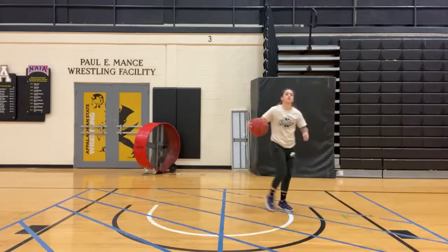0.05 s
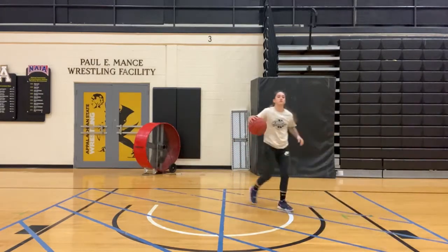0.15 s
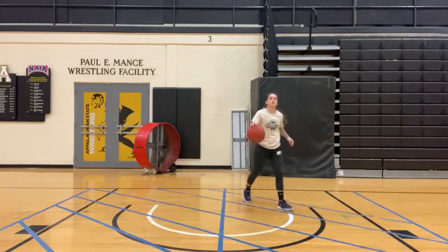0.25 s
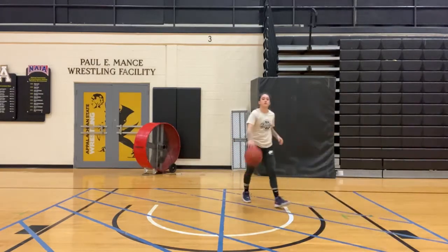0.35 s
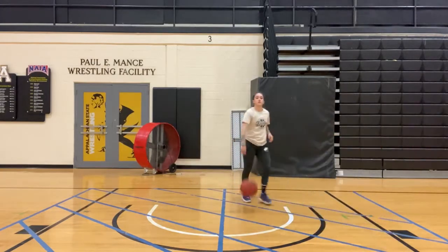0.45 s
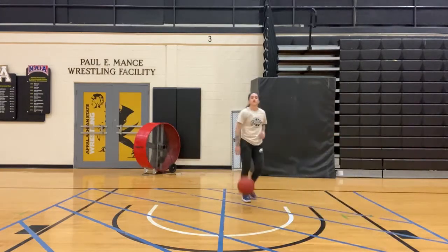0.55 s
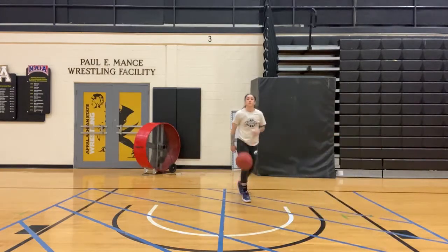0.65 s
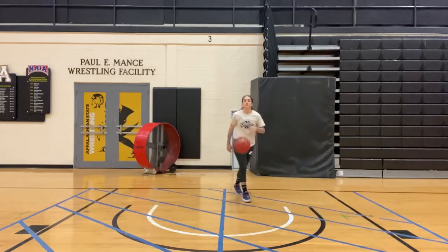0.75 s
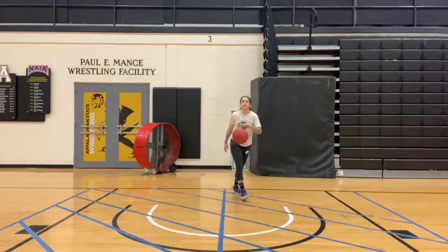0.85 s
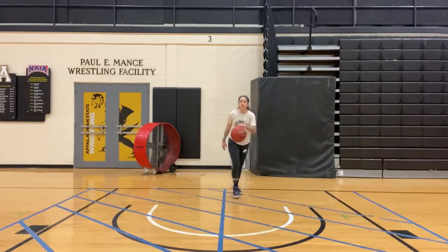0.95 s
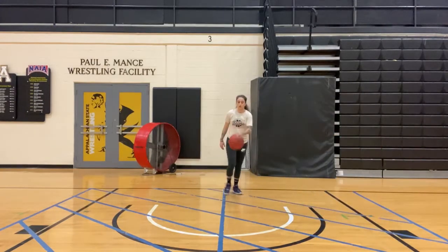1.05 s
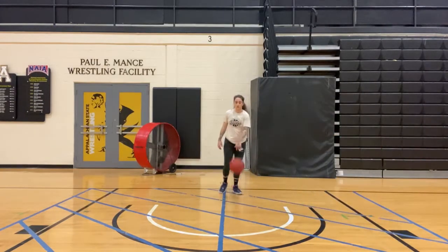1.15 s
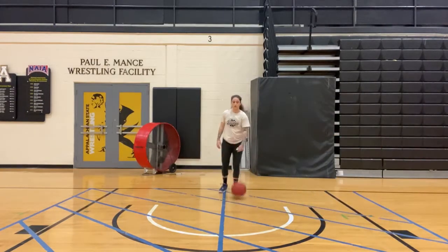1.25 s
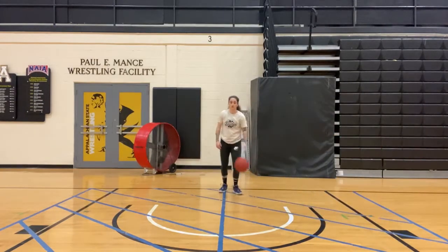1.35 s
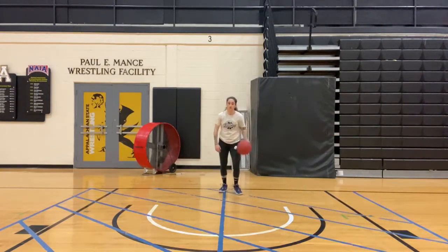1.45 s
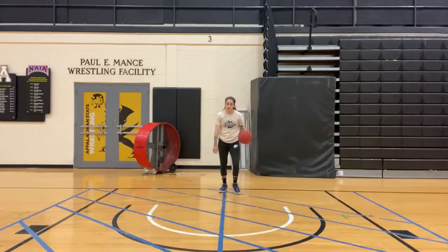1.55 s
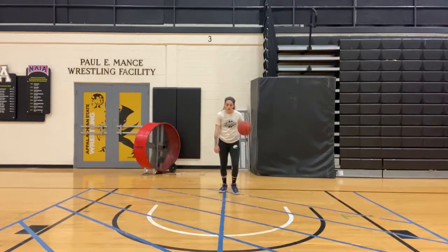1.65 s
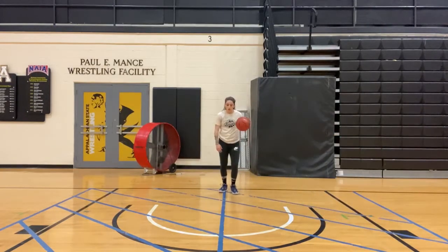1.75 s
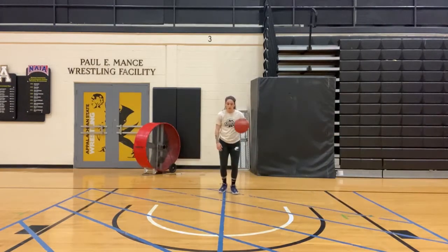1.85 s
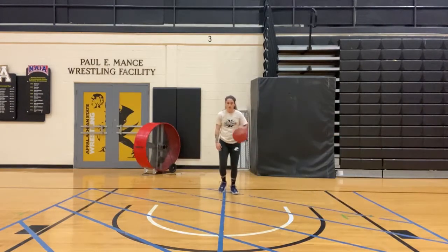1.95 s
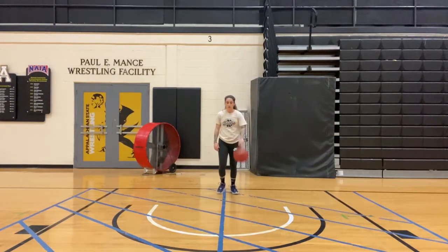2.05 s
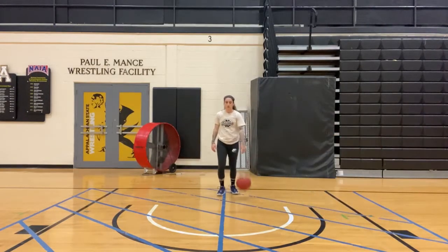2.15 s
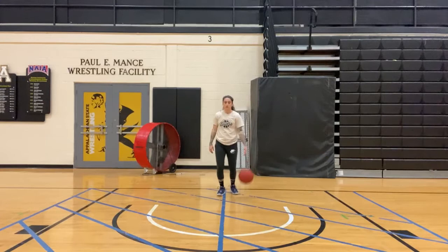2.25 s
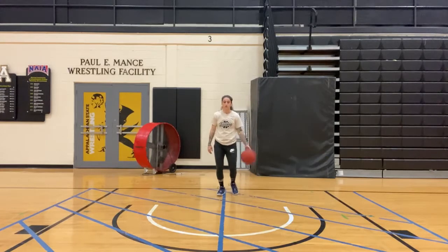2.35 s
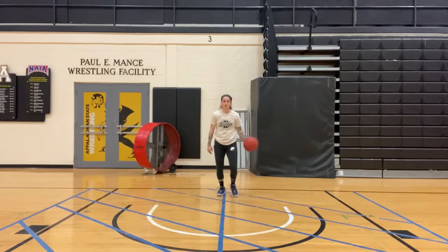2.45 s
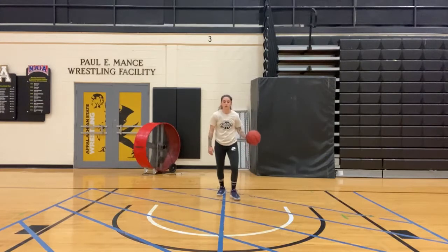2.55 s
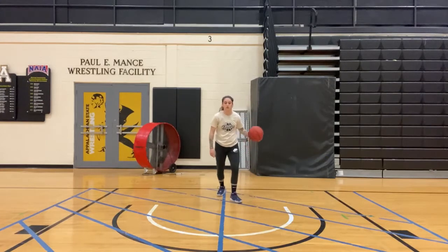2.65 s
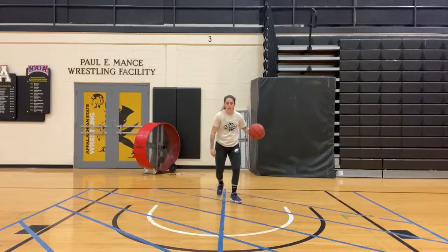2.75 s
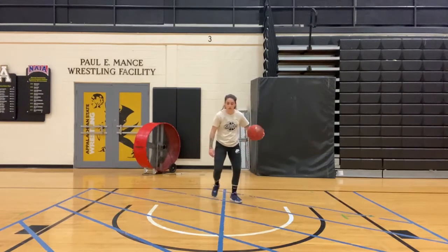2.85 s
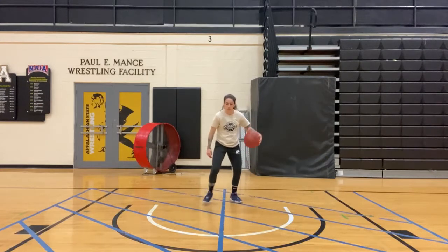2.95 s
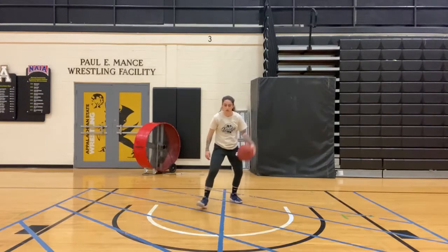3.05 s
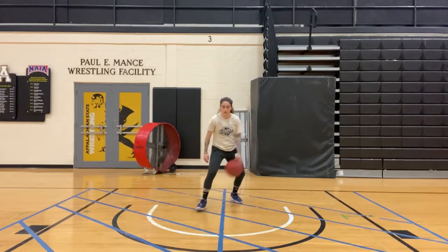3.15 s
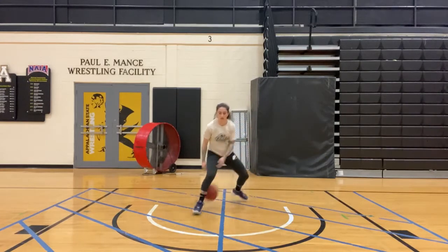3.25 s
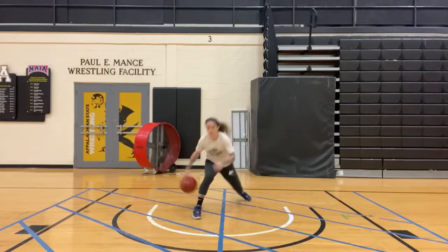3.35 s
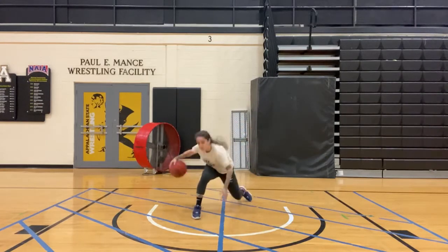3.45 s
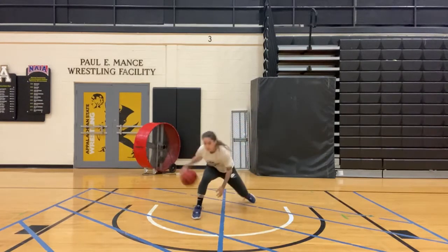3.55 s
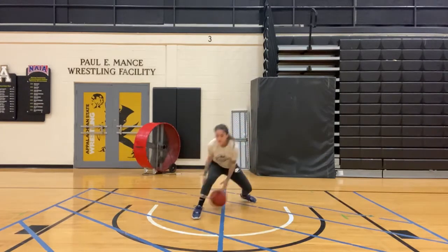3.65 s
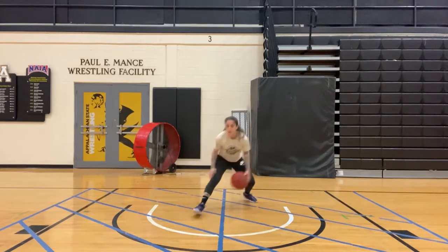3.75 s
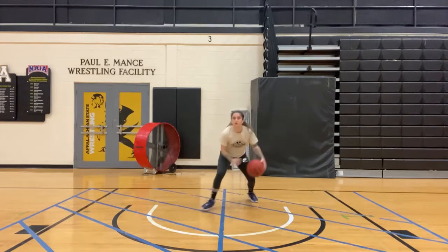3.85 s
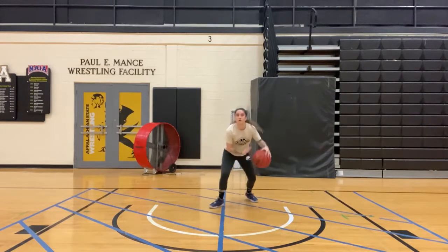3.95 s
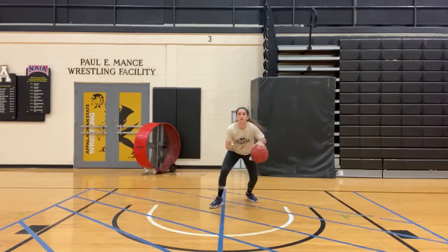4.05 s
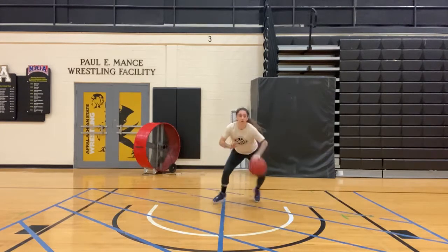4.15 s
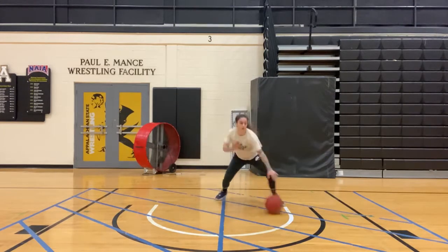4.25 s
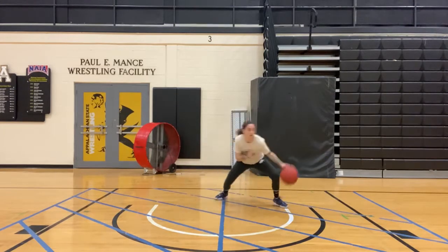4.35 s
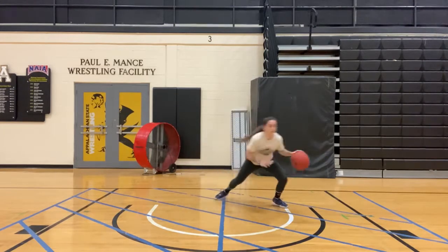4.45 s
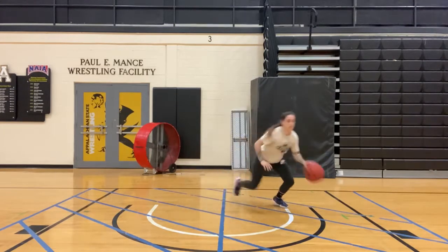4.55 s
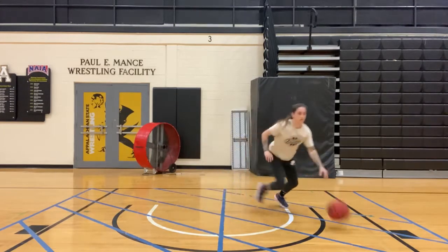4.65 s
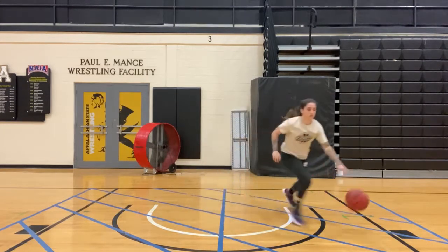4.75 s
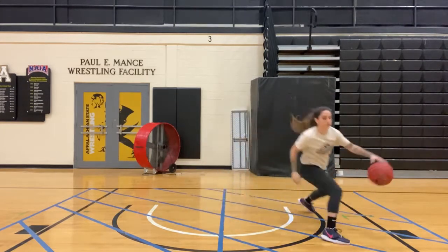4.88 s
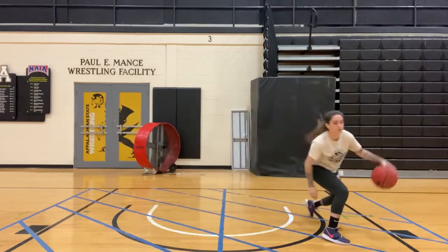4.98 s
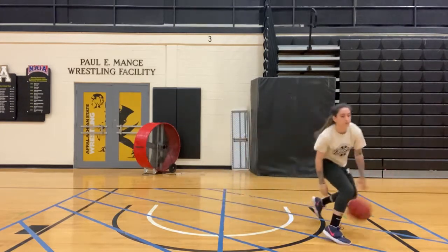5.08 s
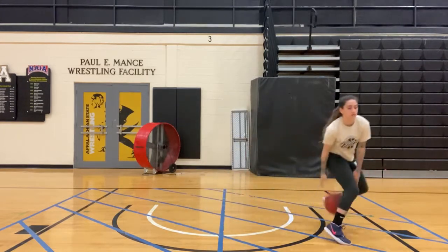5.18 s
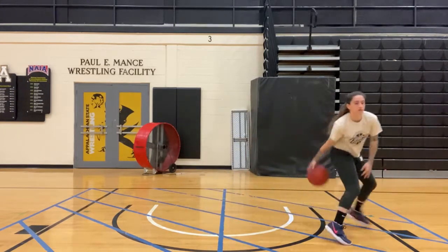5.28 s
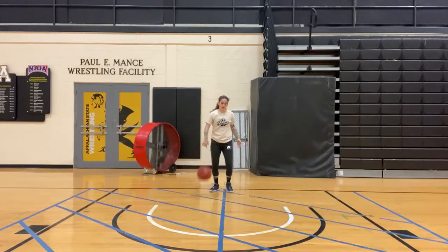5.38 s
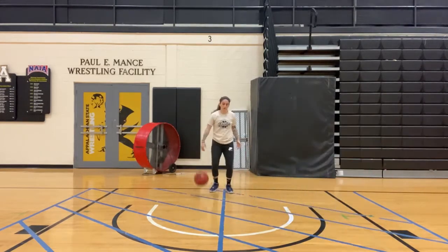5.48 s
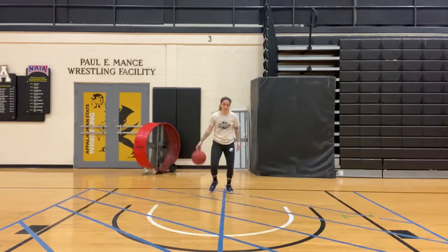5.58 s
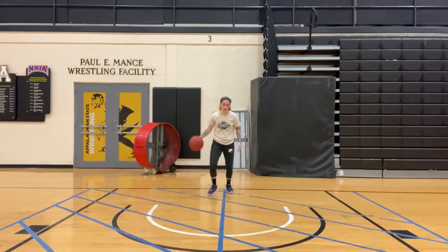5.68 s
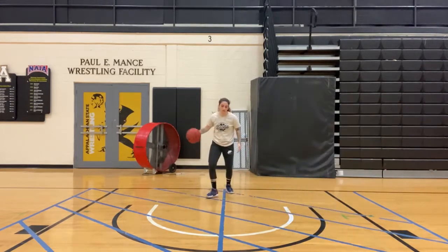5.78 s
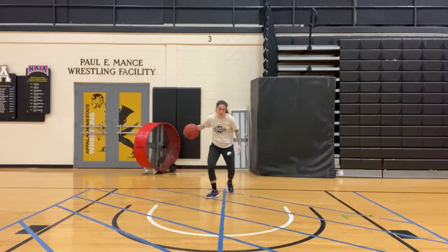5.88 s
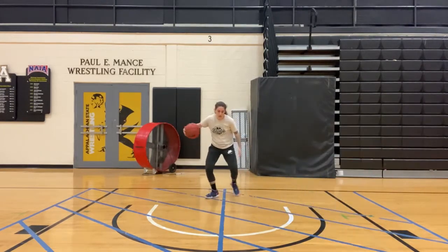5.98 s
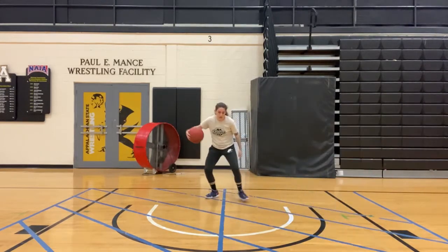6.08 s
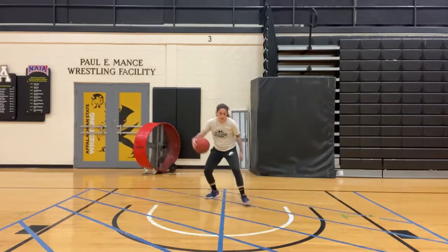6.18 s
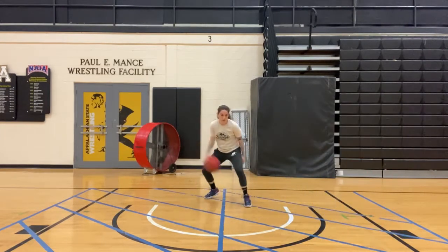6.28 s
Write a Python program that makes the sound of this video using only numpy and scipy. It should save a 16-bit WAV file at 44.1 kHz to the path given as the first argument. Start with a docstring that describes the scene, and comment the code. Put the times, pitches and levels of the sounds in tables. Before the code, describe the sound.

A basketball is dribbled on a sprung wooden floor in a large gym, heard very close from a microphone worn by the player. Single bounces land at about 0.6, 1.3 and 2.3 seconds, each a heavy thump with a rubbery slap, short hollow ring and board clatter. Between them come soft hand pats, small ticks, shirt rustle and low, gusty rumble. The pace rises with a softer bounce at 3.3, almost together with a tiny high squeak and a step jolt, then hard bounces at 3.7, 4.3, 4.7, 5.2 and 5.55. Heel thuds and cloth swishes crowd this burst, with a strong swish at 4.3 and a rougher, wavering squeak near 4.9. After the last bounce, movement eases into light rustle, a faint tap at 5.9 and another near 6.2. Distant echoes and a faint long tail hang over quiet ventilation until about 6.3 seconds.

```python
"""A basketball is dribbled on the sprung wooden floor of a large gym, heard close by from a microphone on the player.
Each bounce is a pressure pulse from the squashed ball, a ringing shell and air cavity, and boards that ring and clatter.
Hands and shoes are short noise bursts; two squeaks are gliding, wavering tones made of several slips of the sole.
Shaped noise rumbles and rustles at the microphone over faint ventilation; the hall adds echoes and a long, faint tail."""
import sys
import numpy as np
from scipy import signal
from scipy.fft import rfft, irfft
from scipy.io import wavfile
from scipy.ndimage import uniform_filter1d

SR = 44100
rng = np.random.default_rng(int(sys.argv[2]) if len(sys.argv) > 2 else 0)


def wav_record(signal):
    """Record a signal, one row per channel, as 16-bit PCM in the file named by sys.argv[1]."""
    frames = np.transpose(np.atleast_2d(signal))
    bounded = np.clip(frames, -1, 1)
    # unit amplitude maps onto the largest positive 16-bit level
    quanta = np.round(bounded * 32767).astype(np.int16)
    wavfile.write(sys.argv[1], SR, quanta)


N = 278712

# The ball meeting the floor. Each row: start in seconds, thump in relative dB, shell slap in relative dB,
# shell pitch ratio, crack of the cover in relative dB, boards in relative dB, board pitch ratio,
# clatter in relative dB, send to the hall in relative dB.
BOUNCES = [ (0.5711, -2.5, -4, 1.012, 1.5, -0.5, 1.118, 6.5, -0.5),
           (1.3163, -2, -0.5, 0.978, 0, -2.5, 1.195, 5, 2),
           (2.2604, -3.5, -5, 0.952, -5.5, -0.5, 1.167, 2, -0.5),
           (3.3393, -7, -11.5, 0.856, -2, 0.5, 1.048, 0, -3),
           (3.6954, -2.5, -3.5, 0.96, 1, 7.5, 1.044, 3, -3.5),
           (4.3134, 0.5, -3.5, 0.956, 0, 2.5, 1.16, 7, -0.5), (4.733, -2, -6, 1.1, 2.5, 2, 1.12, 3, -1),
           (5.185, -2.5, -5.5, 0.954, -1, 5.5, 0.975, 3, -2.5),
           (5.553, -5, -5.5, 1.102, 0.5, -4, 1.127, 2.5, -1)]
# How hard the player moves, easy dribbling and then a burst of crossovers.
# Each row: time in seconds, effort as a relative rumble level in dB.
EFFORT = [(0, -27.5), (.25, -19), (.5, -26.5), (.65, -20), (.97, -31.5), (1.15, -25), (2.1, -31.5),
          (2.5, -39), (2.72, -23.5), (2.85, -27.5), (3.1, -39), (3.45, -16), (4.08, -21), (4.38, -14),
          (5.14, -16.5), (5.38, -23.5), (5.8, -32.5), (6.32, -29)]


def undb(db):
    """Decibels to gain."""
    return 10 ** (np.asarray(db) / 20)


def clock(seconds):
    """Sample times over a duration, in seconds."""
    return np.arange(int(seconds * SR)) / SR


def unit(x):
    """Scale to rms 1."""
    return x / np.sqrt(np.mean(x ** 2))


def curve(rows):
    """Join (seconds, value) rows by straight lines over the whole scene."""
    return np.interp(np.arange(N) / SR, *np.transpose(rows))


def at_hz(points, hz):
    """Read (Hz, value) points on a log-frequency axis."""
    f, value = np.transpose(points)
    return np.interp(np.log(np.maximum(hz, 1)), np.log(f), value)


def noise(points, size):
    """Noise of rms 1 with the spectrum given as (Hz, dB) points."""
    white = rfft(rng.standard_normal(size))
    gain = undb(at_hz(points, np.fft.rfftfreq(size, 1 / SR)))
    return unit(irfft(white * gain, size))


def walk(rate, size):
    """Random wander of spread near 1: straight lines between `rate` random points a second."""
    return np.interp(np.arange(size) * rate / SR, np.arange(size), rng.standard_normal(size))


def butter(x, hz, kind, order=2):
    """Plain low-, high- or band-pass."""
    return signal.sosfilt(signal.butter(order, hz, kind, fs=SR, output="sos"), x)


def fade(t, t60):
    """Exponential decay from t = 0, falling 60 dB in t60 seconds."""
    return (t >= 0) * np.exp(-np.log(1000) * np.abs(t) / t60)


def swell(t, attack_s=0.000692):
    """Onset of a soft contact, which takes a moment to build up from t = 0."""
    return 1 - np.exp(-np.maximum(t, 0) / attack_s)


def ring(modes, t, ratio=1):
    """Damped modes struck at t = 0; no two blows share quite the same tuning."""
    detune = 1 + 0.013 * rng.standard_normal(len(modes))
    total = 0
    for (hz, db, t60), drift in zip(modes, detune):
        total = total + undb(db) * fade(t, t60) * np.sin(2 * np.pi * hz * ratio * drift * t)
    return total


def add(track, s, sound):
    """Mix a sound in at time s, in seconds."""
    i = max(int(s * SR), 0)
    track[i:i + len(sound)] += sound[:N - i]


def ventilation():
    """Moving air in the hall: steady, mostly low noise whose level wavers slightly."""
    # Each row: frequency in Hz, relative level in dB per Hz.
    air_spectrum = [(30, -10), (110, 2.5), (200, -11), (500, -19.5), (1000, -27.5), (2000, -26.5),
                    (4000, -53.5), (9000, -44.5), (16000, -48.5)]
    return undb(-46.5 + walk(12, N)) * noise(air_spectrum, N)


def hall(x):
    """Smeared echoes off distant surfaces and a diffuse tail that loses its treble first."""
    # The tail's colour. Each row: frequency in Hz, relative level in dB.
    tail_spectrum = [(50, -9), (130, -1.5), (300, -4), (800, -8), (1200, -1.5), (1800, -0.5), (2600, -1),
                     (5000, -6), (9000, -9), (16000, -30)]
    # The tail's decay. Each row: frequency in Hz, time to fall 60 dB in seconds.
    tail_t60 = [(100, 1.5), (500, 1.505), (1500, 1.414), (3000, 0.885), (5000, 0.728), (10000, 0.31)]
    # Reflections off bleachers, walls and roof. Each row: delay in seconds, level in dB.
    echoes = [(.040, -29), (.148, -32), (.205, -44), (.275, -39.5)]
    t = clock(1.5)
    wash = rfft(noise(tail_spectrum, len(t)))
    hz = np.fft.rfftfreq(len(t), 1 / SR)
    centres = np.transpose(tail_t60)[0]
    tail = 0
    # overlapping bands that sum to one, each with its own decay
    for (_, t60), band in zip(tail_t60, np.eye(len(centres))):
        weight = at_hz(list(zip(centres, band)), hz)
        tail = tail + irfft(wash * weight, len(t)) * fade(t, t60)
    # the late part is lifted against the decay
    lift = np.interp(t, [.008, .03, .13, .24], [1.0, 0.561, 0.67, 1.697])
    response = undb(-57.0) * tail * lift
    for delay, db in echoes:
        scatter = butter(noise(tail_spectrum, len(t)), 5800, "lowpass") * fade(t - delay, 0.01604)
        # each echo is scaled to unit energy before its level is set
        response = response + undb(db) * scatter / np.sqrt(np.sum(scatter ** 2))
    return signal.fftconvolve(x, response)[:N]


def rumble():
    """Air and body motion rumble on the microphone as the player works; hard steps thud and jolt it."""
    # Each row: frequency in Hz, relative level in dB per Hz.
    rumble_spectrum = [(3, -2), (8, 0.5), (14, 6.5), (26, -3.5), (42, -7.5), (65, -18.5), (110, -23.5),
                       (220, -36.5), (500, -46), (1500, -79)]
    # Hard steps. Each row: jolt centre in seconds, jolt peak in dB, jolt length in seconds, heel thud in dB.
    jolts = [(3.349, -6.5, 0.0131, -23), (3.476, -8.5, 0.0132, -19.5), (3.675, -11, 0.0186, -35.5),
             (4.391, -4.5, 0.00558, -17.5), (4.672, -3.5, 0.01404, -22), (4.997, -4.5, 0.01014, -10)]
    # The heel's thud. Each row: frequency in Hz, relative level in dB.
    heel_spectrum = [(30, -11.5), (90, 5), (180, -14.5), (400, -27.5), (1500, -50), (8000, -79.5)]
    offset_db, gusts_per_s, gust_db = -0.5, 10, 2.53
    heel_lead_s, heel_t60_s = .015, 0.1033

    low = noise(rumble_spectrum, N)
    # even out the noise over 0.15 s, so that effort and gusts set its level
    even = low / np.sqrt(uniform_filter1d(low ** 2, int(.15 * SR)))
    out = undb(curve(EFFORT) + offset_db + gust_db * walk(gusts_per_s, N)) * even
    t = clock(0.28)
    for s, db, length, heel_db in jolts:
        u = clock(6 * length) / length - 3
        # the microphone is pushed one way, with a smaller swing the other way on either side
        jolt = (2 * u ** 2 - 1) * np.exp(-u ** 2)
        add(out, s - 3 * length, undb(db) * jolt)
        thud = noise(heel_spectrum, len(t)) * swell(t) * fade(t, heel_t60_s)
        add(out, s - heel_lead_s, undb(heel_db) * thud)
    return out


def rustle():
    """The shirt rubs in fine grains at the microphone, more with effort, and in brighter swishes on broad swings."""
    # Each row: frequency in Hz, relative level in dB per Hz.
    cloth_spectrum = [(150, 14), (500, 13.5), (1500, 6.5), (3000, 2.5), (6000, -1), (9000, -0.5),
                      (10500, -5.5), (13500, -5), (16000, -35.5)]
    # Broad swings of arms and legs that slide the cloth. Each row: middle in seconds, length in seconds, level in dB.
    swishes = [(0.148, 0.229, -51), (0.327, 0.294, -47), (0.481, 0.0654, -46), (0.885, 0.276, -48.5),
               (1.071, 0.119, -53.5), (1.232, 0.081, -55), (1.876, 0.077, -51.5), (2.045, 0.131, -57),
               (2.269, 0.073, -44.5), (2.785, 0.022, -62.5), (3.138, 0.148, -51), (3.477, 0.078, -38.5),
               (3.603, 0.031, -48), (3.922, 0.232, -43), (4.316, 0.1013, -33.5), (4.558, 0.132, -50),
               (4.843, 0.0317, -37), (4.933, 0.191, -41.5), (5.26, 0.22, -47.5), (5.576, 0.111, -47),
               (5.866, 0.182, -57), (6.26, 0.094, -47.5)]
    # level at an easy pace, that pace on the effort curve, dB gained per dB of effort
    easy_rustle_db, easy_effort_db, rustle_per_effort = -59, -31, 0.55
    folds_per_s, folds_db = 19, 2
    rest_lead_s, rest_s, rest_db = 0.0133, 0.151, -1
    grains_per_s, grain_db, catches_per_s, catch_db = 900, 4.5, 63, 3

    # the arm rests as the ball drops: a dip around every bounce, deepest just before it
    rest = np.zeros(N)
    for s, *_ in BOUNCES:
        add(rest, s - rest_lead_s - rest_s / 2, signal.windows.hann(int(rest_s * SR)))
    rub_db = easy_rustle_db + rustle_per_effort * (curve(EFFORT) - easy_effort_db)
    # the rustle comes and goes with the folds of the cloth
    rub = undb(rub_db + folds_db * walk(folds_per_s, N) + rest_db * rest)

    swish = np.zeros(N)
    for s, length, db in swishes:
        add(swish, s - length / 2, undb(db) * signal.windows.tukey(int(length * SR), .8))

    # the weave rubs in fine grains, with slower catches over them
    weave_db = grain_db * walk(grains_per_s, N) + catch_db * walk(catches_per_s, N)
    cloth = unit(undb(weave_db)) * noise(cloth_spectrum, N)
    # gentle rubbing is duller than a swish
    return rub * butter(cloth, 10200, "lowpass") + swish * cloth


def taps():
    """Hands on the ball and shoes on the floor: a soft pat under a short bright tick, with fainter ticks scattered."""
    # The clearest contacts. Each row: start in seconds, dull pat in relative dB, sharp tick in relative dB.
    contacts = [(0.0452, -26.5, -37.5), (0.224, -21, -30.5), (.45, -33, -27), (0.6134, -24.5, -28),
                (0.774, -52, -28), (1.087, -24, -19), (1.751, -24, -36.5), (1.7809, -33.5, -34.5),
                (1.8107, -42.5, -41.5), (1.9305, -50.5, -39.5), (1.99, -29.5, -30), (2.1928, -26.5, -39.5),
                (2.6894, -29.5, -54.5), (3.1743, -31, -28), (3.472, -21, -35), (3.8631, -30.5, -19.5),
                (3.998, -23, -49), (4.3949, -20, -28), (4.6344, -17, -26.5), (4.687, -19.5, -47.5),
                (4.771, -27, -25.5), (4.9842, -18.5, -30.5), (5.0724, -18.5, -31.5), (5.889, -33, -41),
                (6.2351, -43.5, -35.5)]
    # Each row: frequency in Hz, relative level in dB.
    pat_spectrum = [(80, 0), (300, 9), (700, -4), (1200, -7.5), (2500, -21), (8000, -44)]
    # Each row: frequency in Hz, relative level in dB.
    tick_spectrum = [(500, 8.5), (1500, 2.5), (3000, 9), (5000, 4), (9000, -3.5), (15000, -21.5)]
    # faint ticks of fingers and clothing
    ticks_per_s, faint_db, scatter_db, faint_t60_s = 11, -51, 10, .005

    out, t = np.zeros(N), clock(0.11)
    snap = fade(t, .006) + undb(-17) * fade(t, .035)
    for s, pat_db, tick_db in contacts:
        # a pat builds up faster than the give of the boards
        pat = noise(pat_spectrum, len(t)) * swell(t, 0.000281) * fade(t, 0.025)
        tick = noise(tick_spectrum, len(t)) * snap
        add(out, s, undb(pat_db - 2.5) * pat + undb(tick_db - 5.0) * tick)
    for place, strength in rng.random((int(ticks_per_s * N / SR), 2)):
        db = faint_db + scatter_db * (2 * strength - 1)
        add(out, place * N / SR, undb(db) * noise(tick_spectrum, len(t)) * fade(t, faint_t60_s))
    return out


def ridge(hz, rough):
    """One ridge of the tread sticks and slips; a rough slip wavers in pitch and buzzes with harmonics."""
    waver = 1 + 0.1 * rough * walk(859.0, len(hz))
    phase = 2 * np.pi * np.cumsum(hz * waver) / SR
    buzz = undb(-19.5) * np.sin(2 * phase) + undb(-33.5) * np.sin(3 * phase)
    return np.sin(phase) + rough * buzz


def squeaks():
    """A rubber sole squeals near 5 kHz; in rough slips off-pitch ridges join and it scrapes. Gives near and hall sound."""
    # Slips of the sole. Each row: start in seconds, length in seconds, start pitch in Hz, middle pitch in Hz,
    # end pitch in Hz, level in relative dB, roughness from 0 to 1.
    slips = [(3.349, 0.00593, 5278, 4795, 4840, -10, 0.09), (3.352, 0.01866, 4823, 4993, 5534, -12.5, 0.12),
             (4.854, 0.0133, 6210, 5723, 5370, -20, 0.2), (4.8615, 0.026, 5800, 6046, 5874, -22, 0.54),
             (4.864, 0.02, 5342, 4950, 4750, -23, 0.42), (4.885, .017, 4907, 5255, 4723, -6, 0.41),
             (4.899, .020, 4642, 4672, 4950, -13.5, 0.8), (4.9043, 0.0022, 5140, 5194, 5000, -4.5, 0),
             (4.9155, 0.011, 4710, 4847, 5024, -12.5, 0.4)]
    # Each row: frequency in Hz, relative level in dB.
    scrape_spectrum = [(600, -10), (1800, 5), (2800, 0), (4300, 3), (6500, -12), (9500, 9), (12000, -26.5),
                       (16000, -22)]
    # the hall gets the slips more evenly: level of a 0 dB slip, and the share of each slip's dB that carries over
    hall_db, hall_share = -6.5, 0.46

    near, far = np.zeros(N), np.zeros(N)
    for s, length, start_hz, middle_hz, end_hz, db, rough in slips:
        u = clock(length) / length
        hz = np.interp(u, np.linspace(0, 1, 3), [start_hz, middle_hz, end_hz])
        neighbours = ridge(.9 * hz, rough) + ridge(1.1926 * hz, rough)
        tone = ridge(hz, rough) + rough * undb(-12.5) * neighbours
        scrape = rough * undb(-12.5) * noise(scrape_spectrum, len(u))
        grip = signal.windows.tukey(len(u), .5) * undb(2.96 * rough * walk(494, len(u)))
        squeal = grip * (tone + scrape)
        add(near, s, undb(db) * squeal)
        add(far, s, undb(hall_db + hall_share * db) * squeal)
    return near, far


def bounces():
    """The ball flattens on the boards and springs back within about 10 ms; gives near sound and what the hall receives."""
    # The slapped rubber shell. Each row: frequency in Hz, relative level in dB, time to fall 60 dB in seconds.
    shell_modes = [(853, -20, 0.0194), (1250.6, -6, 0.01965), (1507, -18, 0.0188), (2073, -9.5, 0.00763),
                   (2932, -22.5, 0.0139)]
    # The air inside the ball. Each row: frequency in Hz, level in dB, time to fall 60 dB in seconds.
    cavity_modes = [(996.84, -43.5, 0.54), (1149.5, -46, 0.16), (1650, -73, .2), (2174, -41, 0.129),
                    (2770, -52, 0.18), (3101.1, -46, .22)]
    # The floor boards. Each row: frequency in Hz, relative level in dB, time to fall 60 dB in seconds.
    board_modes = [(129.9, -17, 0.0394), (247.6, -21, 0.038), (455.4, -20, 0.0598), (507.37, -24, 0.0334),
                   (614.6, -21.5, 0.0242), (782, -36, 0.021)]
    # The cover's crack. Each row: frequency in Hz, relative level in dB.
    crack_spectrum = [(200, -40), (700, -13.5), (1400, 10.5), (2200, 4.5), (3200, -22), (5000, -10),
                      (8500, -17), (11000, -29.5), (16000, -52.5)]
    # The boards' clatter. Each row: frequency in Hz, relative level in dB.
    clatter_spectrum = [(100, 3.5), (300, 3.5), (520, 3.5), (800, -9), (1300, 1.5), (2100, -6), (3000, -15),
                        (8000, -30.5), (16000, -48)]
    # A whole bounce as it spreads in all directions into the hall. Each row: frequency in Hz, relative level in dB.
    spread_spectrum = [(40, 0), (100, -1), (260, -14.5), (650, -24), (1000, -20), (1600, -21.5),
                       (2300, -25.5), (3300, -29), (6500, -34), (16000, -55)]
    contact_s = .0098  # time the ball stays on the boards

    near, far, t = np.zeros(N), np.zeros(N), clock(.4)
    release = t - 1.0059 * contact_s
    for s, thump_db, slap_db, ratio, crack_db, boards_db, board_ratio, clatter_db, hall_db in BOUNCES:
        # the lost volume goes as sine squared; its acceleration radiates one cosine cycle with abrupt ends
        squash = -np.cos(2 * np.pi * t / contact_s) * (t < contact_s) * fade(t, 0.23)
        thump = butter(butter(squash, 20, "highpass", order=1), 577, "lowpass")
        # the shell is pushed inwards, so its ring starts with a drop in pressure
        shell = -ring(shell_modes, t - .0002, ratio) + ring(cavity_modes, t)
        # the grain of the cover cracks on landing and, more softly, as it peels off
        landing = fade(t, 0.01143) + undb(-11.0) * fade(t, 0.0222)
        peeling = undb(-32) * fade(release, 0.0028)
        crack = undb(-13) * noise(crack_spectrum, len(t)) * (landing + peeling)
        ball = undb(thump_db) * thump + undb(slap_db) * shell + undb(crack_db) * crack
        # the boards spring back and clatter as the ball leaves them; each spot has its own pitch
        boards = -ring(board_modes, release, board_ratio)
        rattle = swell(release) * (fade(release, 0.0292) + undb(-18.0) * fade(release, 0.145))
        clatter = undb(-22.5) * noise(clatter_spectrum, len(t)) * rattle
        add(near, s, ball + undb(boards_db) * boards + undb(clatter_db) * clatter)
        add(far, s, undb(hall_db) * noise(spread_spectrum, len(t)) * swell(t) * fade(t, 0.0378))
    return near, far


def scene():
    """The play on the court, its reverberation, the player's own movement and the ventilation."""
    ball, ball_far = bounces()
    soles, soles_far = squeaks()
    pats = taps()
    # the highest part of squeaks and taps carries less into the hall
    far = ball_far + butter(pats + soles_far, 6500, "lowpass", order=4)
    court = ball + soles + pats + hall(far)
    return (court + rumble() + rustle() + ventilation())[None]


def record(dry):
    """The recorder clips at full scale and then cuts the top above 15.7 kHz."""
    top_cut = signal.ellip(8, .2, 70, 15700, fs=SR, output="sos")
    return signal.sosfilt(top_cut, np.clip(dry, -1, 1))


dry = scene()
out = record(dry)
wav_record(out)
```